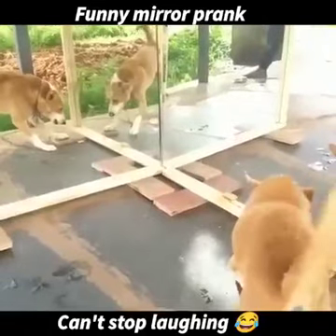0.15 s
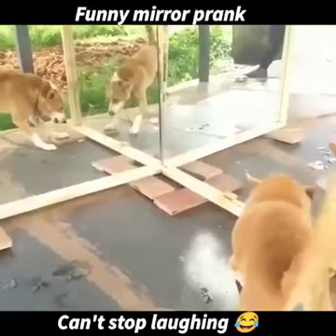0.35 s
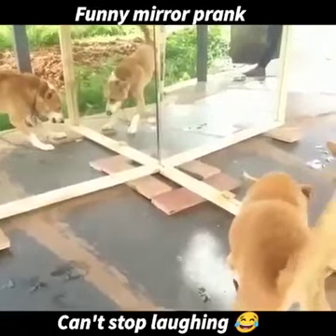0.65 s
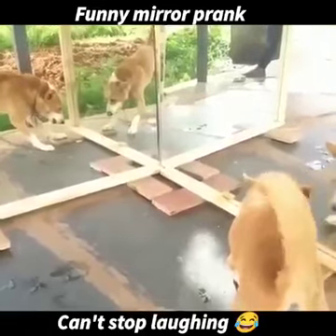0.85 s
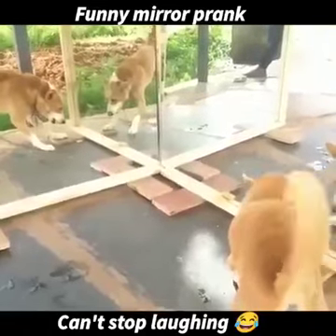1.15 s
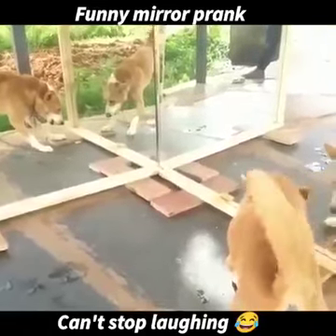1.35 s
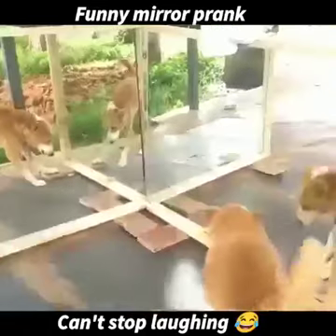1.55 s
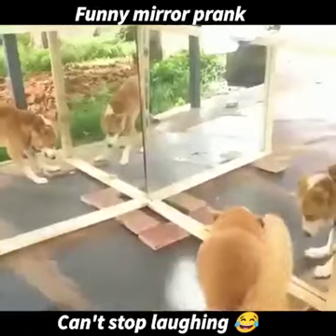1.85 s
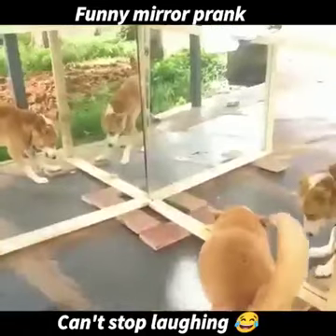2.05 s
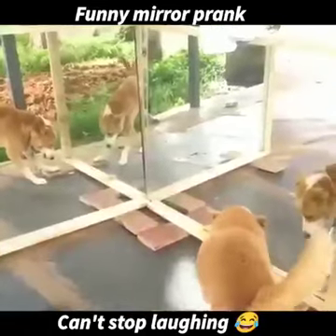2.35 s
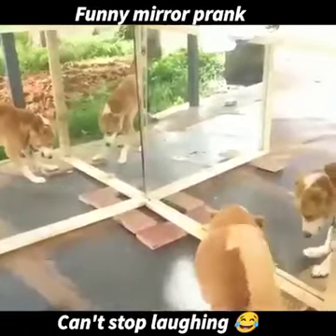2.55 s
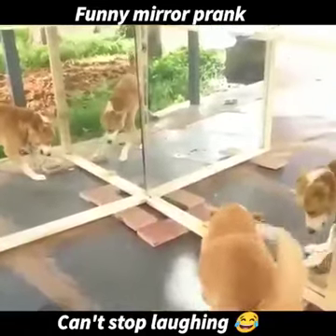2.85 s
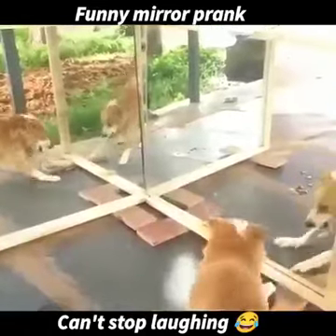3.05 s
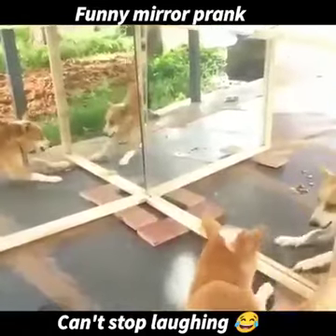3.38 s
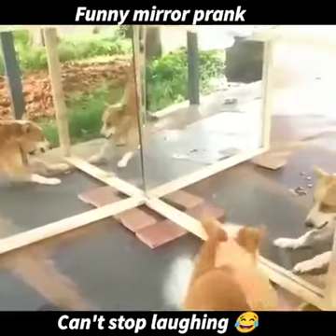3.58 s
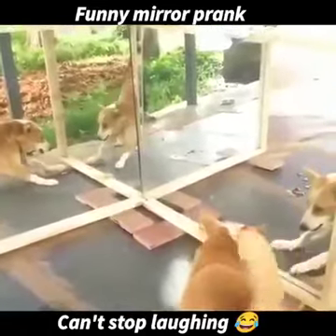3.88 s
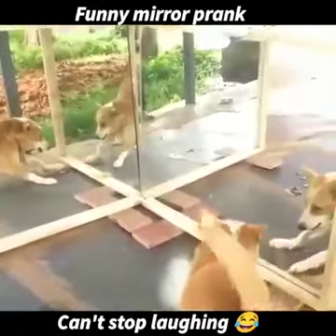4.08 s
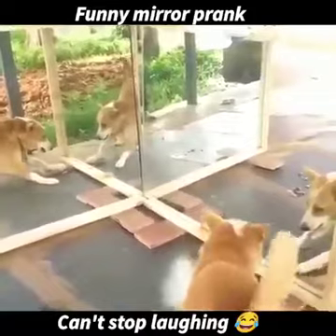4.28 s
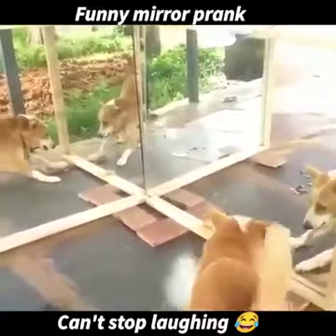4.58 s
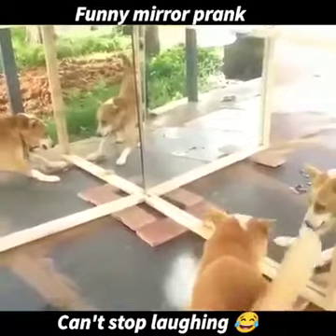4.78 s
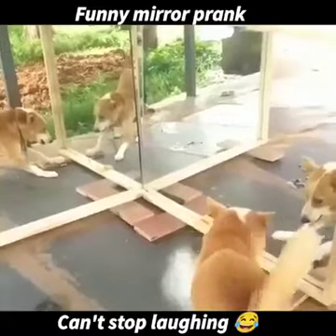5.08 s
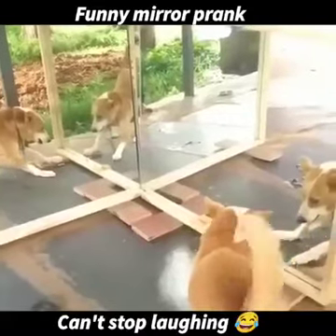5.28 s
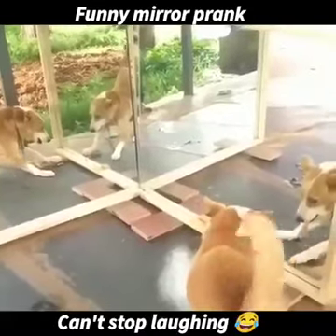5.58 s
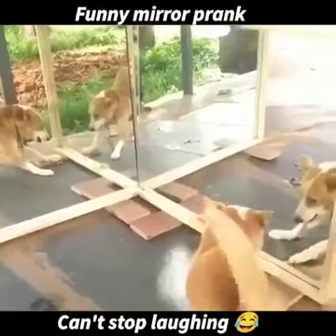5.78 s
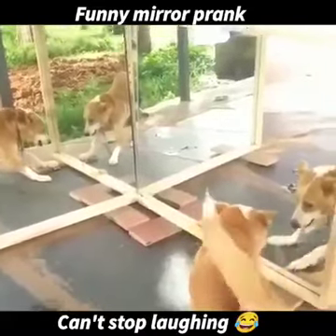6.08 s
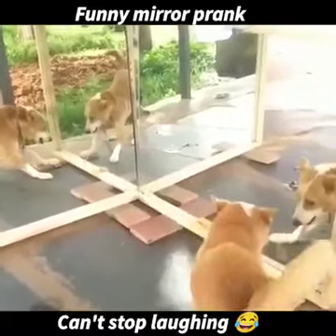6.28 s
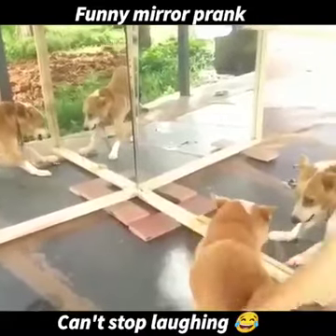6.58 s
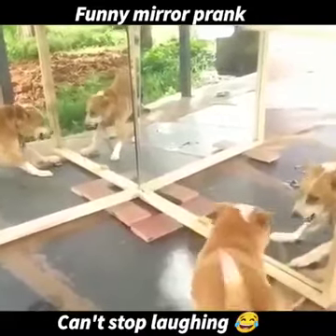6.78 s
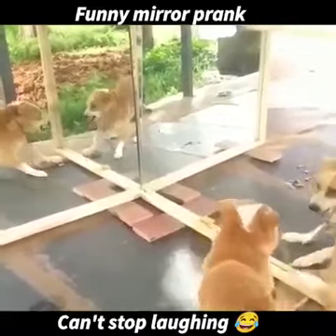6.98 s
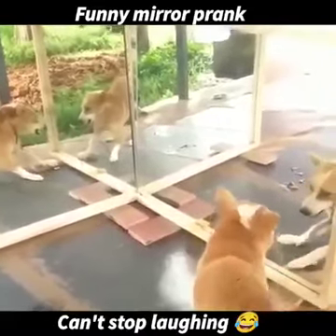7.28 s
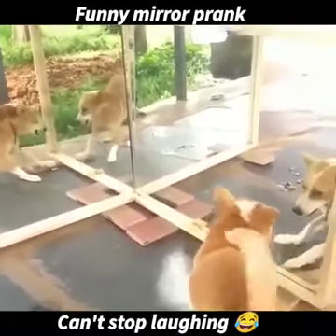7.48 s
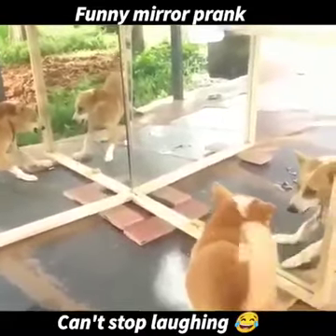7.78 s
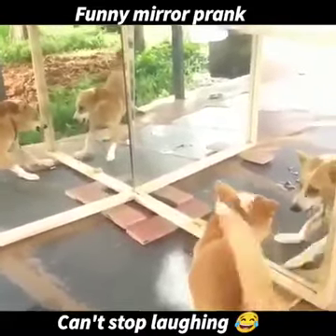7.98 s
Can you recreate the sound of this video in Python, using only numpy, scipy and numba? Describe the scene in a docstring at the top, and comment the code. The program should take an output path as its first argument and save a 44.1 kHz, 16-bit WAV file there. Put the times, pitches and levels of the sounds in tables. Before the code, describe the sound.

A small dog growls close by on a hard-floored, roofed patio. From 0 to 1 s the growl is already strong: an uneven flutter around fifty beats a second, hard hollow throat pops, chest hum and rasp of air. A second stroke starts at 1.05 s, more breathy; at about 1.6 s a nasal snarl with a thin whine leads into a weaker growl until 2.5 s. After a near pause come snorts, a small grunt, a snap and one abrupt hoarse bark at 3.0-3.1 s, then a drawn breath. Quiet growling builds from 3.4 s; from 4.15 to 5.35 s it is loud and full of pops and wet crackles. Rougher strokes follow to 6.7 s, where a hoarse cluster of barks tumbles out until 7 s with a huff. A faint growl follows from 7.1 s, then a firmer one from 7.7 s, swelling near 8 s. Short wall echoes, faint yard noise.

```python
"""On a roofed patio a small dog squares up to a mirror and growls in long runs, a stroke of air at a time.
Pulse trains and noise are the source, resonators the vocal tract: loose folds flap unevenly in the throat,
the chest hums below and air rasps past the teeth. Snorts, a nasal snarl and two outbreaks of hoarse barking
break in. Near walls answer briefly with a decaying wash, and a close pair of microphones turns the treble
in and out of phase."""
import sys
import numpy as np
from scipy import signal
from scipy.fft import rfft, irfft, next_fast_len
from scipy.io import wavfile
from scipy.ndimage import uniform_filter1d
from numba import njit

SR = 44100
rng = np.random.default_rng(int(sys.argv[2]) if len(sys.argv) > 2 else 0)


def pcm_store(signal):
    """Save signal as 16-bit PCM."""
    levels = np.round(np.clip(np.atleast_2d(signal), -1, 1) * 32767)
    wavfile.write(sys.argv[1], SR, levels.astype(np.int16).T)


N = 358974
TIME = np.arange(N) / SR

# single hard flaps that burst out of the growl: crest t/s, relative level/dB, 1/e half length/s, ring f/Hz
HARD_FLAPS = [(0.024, -9.5, 0.004, 655), (0.087, -13, 0.013, 660), (0.102, -10, 0.0061, 618),
              (0.141, -11.5, 0.0039, 618), (0.2, -15.5, 0.0055, 630), (0.275, -10, 0.0066, 585),
              (0.32, -11.0, 0.009, 678), (0.335, -10, 0.0058, 655), (0.358, -5.5, 0.0039, 658),
              (0.381, -8, 0.0019, 655), (0.39, -11.5, 0.003, 655), (0.431, -8.5, 0.0052, 610),
              (0.45, -11, 0.0036, 610), (0.536, -11.5, 0.013, 612), (0.565, -10.5, 0.013, 668),
              (0.584, -7, 0.0041, 660), (0.596, -7.5, 0.0021, 655), (0.625, -7.0, 0.0031, 692),
              (0.652, -13, 0.004, 645), (0.71, -13, 0.0032, 645), (0.792, -12, 0.0035, 630),
              (0.892, -12.5, 0.0072, 657), (0.922, -8.5, 0.0042, 715), (0.978, -15.5, 0.0034, 647),
              (4.159, -25.5, 0.005, 630), (4.331, -15, 0.0033, 607), (4.449, -10.5, 0.0055, 600),
              (4.532, -8.5, 0.0079, 618), (4.579, -7.5, 0.0045, 658), (4.633, -10.5, 0.0099, 609),
              (4.694, -11.0, 0.0037, 636), (4.712, -10.5, 0.0061, 655), (4.745, -3, 0.0033, 637),
              (4.785, -13.5, 0.0034, 597), (4.833, -10, 0.0054, 606), (4.884, -9.5, 0.0043, 628),
              (4.9, -12, 0.011, 650), (4.922, -11, 0.0066, 602), (5.012, -14, 0.004, 616),
              (5.037, -7, 0.0052, 680), (5.06, -9, 0.0058, 682), (5.134, -9.5, 0.0027, 655),
              (5.171, -5, 0.0062, 617), (5.188, -7, 0.0025, 640), (5.237, -11.5, 0.0078, 633),
              (5.262, -6, 0.0025, 650), (5.555, -19.5, 0.008, 692), (5.606, -13.5, 0.0044, 680),
              (5.717, -16.0, 0.0038, 673), (5.733, -17, 0.011, 706), (5.779, -13.5, 0.0031, 662),
              (5.973, -15.5, 0.0068, 692), (6.147, -17, 0.0055, 647), (6.198, -13.5, 0.0049, 643),
              (6.31, -18, 0.0045, 658), (6.46, -15, 0.0035, 692), (6.495, -12.5, 0.0032, 667),
              (6.638, -23, 0.0042, 666), (6.713, -13, 0.004, 668), (6.725, -11, 0.0066, 677),
              (6.751, -6.5, 0.0061, 607), (6.77, -6.5, 0.0054, 705), (8.003, -13.5, 0.0032, 638),
              (8.099, -14, 0.0051, 680)]
# resonances of the cheeks: f/Hz, width/Hz, relative level/dB
CHEEK_MODES = [(1214, 510, -4.5), (2034, 63, 4)]
# resonances that bursts of spit ring with: f/Hz, width/Hz, relative level/dB
SPIT_MODES = [(3210, 200, -2), (3630, 450, -9)]
VOICE_TAIL_S = 0.03   # the barking voice runs on weakly after the push


def from_db(db):
    """Logarithmic level: decibels to amplitude gain."""
    return 10 ** (np.asarray(db) / 20)


def rms_one(x):
    """Power normalisation: scale to an rms of 1."""
    return x / np.sqrt(np.mean(x ** 2) + 1e-20)


def at_hz(points, hz):
    """Interpolation on a log-frequency axis, on which the ear hears pitch."""
    points = np.array(points)
    return np.interp(np.log(hz + 1e-3), np.log(points[:, 0]), points[:, 1])


def noise(spectrum):
    """Spectral shaping: white noise weighted by frequency, with an rms of 1."""
    size = next_fast_len(N)
    hz = np.fft.rfftfreq(size, 1 / SR)
    white = rfft(rng.standard_normal(size))
    return rms_one(irfft(white * from_db(at_hz(spectrum, hz)), size)[:N])


def drift(rate):
    """Low-passed chance: a smooth random curve of rms 1 that changes about rate times a second."""
    step = 40   # samples between the computed points
    r = np.exp(-2 * step * np.pi * rate / SR)
    settling = 2000
    chance = rng.standard_normal(N // step + settling + 2)
    slow = signal.lfilter([1], [1, -2 * r, r * r], chance)[settling:]
    return np.interp(np.arange(N) / step, np.arange(len(slow)), rms_one(slow))


def pulses(hz, jitter, shimmer_db, anchors_s=None):
    """Glottal source: a click a cycle, with jitter in timing and shimmer in level; anchors pull the phase."""
    cycles = np.cumsum(hz * np.exp(jitter * drift(np.mean(hz) / 2))) / SR
    if anchors_s is not None:
        anchor_phase = 2 * np.pi * np.interp(anchors_s, TIME, cycles)
        offsets = np.unwrap(anchor_phase) / (2 * np.pi)
        cycles = np.maximum.accumulate(cycles - np.interp(TIME, anchors_s, offsets))
    clicks = np.diff(np.floor(cycles), prepend=np.floor(cycles[0]))
    return clicks * from_db(shimmer_db * np.clip(rng.standard_normal(N), -2, 2))


def fade(clicks, decay_s):
    """Exponential relaxation: each click becomes a puff that dies away."""
    return signal.lfilter([1], [1, -np.exp(-1 / (decay_s * SR))], clicks + 1e-18)


@njit
def ring(x, pull, r):
    """Damped oscillator: a two-pole resonator whose centre may move from sample to sample."""
    y = np.zeros(len(x))
    for i in range(2, len(x)):
        push = (x[i] - x[i - 2]) * (1 - r * r) / 2
        y[i] = push + pull[i] * y[i - 1] - r * r * y[i - 2] + 1e-18
    return y


def resonate(x, modes):
    """Modal superposition: parallel resonances of alternating sign; centre and level may be curves."""
    out = 0
    for k, (hz, width, db) in enumerate(modes):
        r = np.exp(-np.pi * width / SR)
        pull = np.zeros(N) + 2 * r * np.cos(2 * np.pi * hz / SR)
        out = out + (-1) ** k * from_db(db) * ring(x, pull, r)
    return out


def cut(x, hz, kind, order=2):
    """Band limitation by a Butterworth low-pass or high-pass."""
    return signal.sosfilt(signal.butter(order, hz, kind, fs=SR, output="sos"), x)


def even(x, size):
    """Short-term power normalisation: hold the rms near 1 over size samples, leaving faster flutter."""
    power = uniform_filter1d(uniform_filter1d(x ** 2, size), size // 2)
    return x / np.sqrt(np.abs(power) + 1e-12)


def flap_drive(flaps, puff_s, leak):
    """Airflow modulation: every flap lets a puff swell and die; some air leaks in between."""
    return rms_one(rms_one(fade(fade(flaps, puff_s), puff_s)) + leak)


def strokes():
    """Subglottal pressure: the push of air sets five part gains; each stroke has its own flap rate."""
    # strokes of the growl: start t/s, crest t/s, end t/s, swell/dB, sag/dB, nominal flap rate/Hz,
    # then relative level/dB at the crest of throat, pharynx, chest, rasp and air
    stroke_table = [(0, 0.56, 1.048, 0, 1, 54, -19, -27, -33.5, -30.5, -45.5),
                    (1.05, 1.172, 1.594, 7, 13.5, 47, -24.5, -31, -28.5, -27.5, -39),
                    (1.57, 1.785, 2.488, 16, 1, 55, -29, -25, -29, -38, -43.5),
                    (3.365, 4.035, 4.11, 5, -14.5, 54, -31.5, -38.5, -39, -39, -48.5),
                    (4.15, 4.59, 5.365, 6.5, 0, 44, -20.5, -29, -35.5, -36, -49),
                    (5.36, 5.637, 6.124, 8.5, 6.5, 52, -23, -30, -29.5, -29.5, -39),
                    (6.117, 6.158, 6.625, 4.5, 3, 54, -24.5, -34, -31.5, -33, -43),
                    (6.603, 6.742, 6.84, 10.5, 22, 60, -20.5, -22.5, -30.5, -45, -43.5),
                    (7.09, 7.414, 7.665, 18, 0.5, 68, -37, -45, -42.5, -48.5, -53),
                    (7.674, 8.053, 8.65, 13.5, 8, 63, -25, -34.5, -39.5, -44, -56.5)]
    # how far throat, pharynx, chest, rasp and air follow the push: ratio/(dB per dB)
    follows = (1.02, 1.19, 1.09, 1.3, 1.27)
    # the push slackens for a moment in mid-stroke: t/s, depth/dB, 1/e half length/s
    slack_table = [(0.48, 2.5, 0.021), (0.834, 3.5, 0.027), (3.857, 3.5, 0.11), (4.952, 1.5, 0.03),
                   (5.854, 0.5, 0.03), (6.398, 1.5, 0.034)]
    attack_s, release_s = 0.053, 0.065
    pharynx_fade_db = 5.5   # the hollow tone thins out over each stroke as the jaw loosens
    gains, flap_hz = np.zeros((5, N)), np.zeros(N)
    slack_db = 1.74 * drift(8.3)   # the push is never quite steady
    for s, db, half_s in slack_table:
        slack_db = slack_db + db * np.exp(-np.minimum(((TIME - s) / half_s) ** 2, 20))
    for start, crest, end, swell_db, sag_db, rate, *levels_db in stroke_table:
        span = (TIME >= start) & (TIME < end)
        t = TIME[span]
        push_db = np.interp(t, [start, crest, end], [-swell_db, 0, -sag_db]) - slack_db[span]
        # the first stroke is already under way
        rise = np.minimum((t - start) / attack_s, 1) if start > attack_s else 1
        gate = rise * np.minimum((end - t) / release_s, 1) ** 2
        parts_db = np.array(levels_db)[:, None] + np.outer(follows, push_db)
        parts_db[1] -= pharynx_fade_db * ((t - start) / (end - start) - .5)
        gains[:, span] += gate * from_db(parts_db)
        flap_hz[TIME >= start] = rate
    return gains, flap_hz


def tract():
    """Formant theory: resonances of throat and muzzle move with tongue, jaw and lips."""
    # fixed throat resonances: f/Hz, width/Hz, relative level/dB
    throat_modes = [(428, 70, -12), (589.3, 84.5, 0)]
    # highest throat resonance: f/Hz, width/Hz, relative level/dB
    throat_top = (1466, 350, -27)
    # muzzle resonances: f/Hz, width/Hz, relative level/dB
    muzzle_modes = [(2552, 156, -1.5), (2660, 160, 4)]
    # resonance at the teeth: f/Hz, width/Hz, relative level/dB
    teeth_mode = (4035, 240, -4)
    # mouth shape as the growl goes on: t/s, throat f/Hz, tongue f/Hz, tongue level/dB, mouth f/Hz,
    # cheek level offset/dB, lip f/Hz, lip level/dB
    shape_table = [(0.3, 675, 810, -7.5, 992, 0.5, 3017, 9.5), (1.3, 669, 798, -1.5, 976, -6, 3174, 0.5),
                   (2.1, 719, 827, -15, 914, -6.5, 3250, 4), (3.8, 714, 780, -26, 970, 0.5, 3070, -1.5),
                   (4.6, 653, 752, -7, 1002, 2.5, 3115, 2.5), (5.22, 684, 753, -10.5, 990, 1.5, 3210, 5),
                   (5.7, 708, 780, -12, 970, 1.5, 3120, -0.5), (6.4, 708, 796, -1, 973, 3.5, 3120, 6.5),
                   (7.4, 703, 764, -9, 920, -4, 3200, 1), (8.0, 704, 747, -10, 892, 1, 3350, 8)]
    times, *columns = np.transpose(shape_table)
    curves = (np.interp(TIME, times, column) for column in columns)
    throat_hz, tongue_hz, tongue_db, mouth_hz, cheeks_db, lips_hz, lips_db = curves
    # moving modes: centre Hz, width Hz, level dB
    moving = [(throat_hz, 63, 2), (tongue_hz, 39.5, tongue_db), (mouth_hz, 91, -10.5)]
    cheeks = [(hz, width, db + cheeks_db) for hz, width, db in CHEEK_MODES]
    return throat_modes + moving + [throat_top], cheeks + muzzle_modes + [(lips_hz, 122, lips_db), teeth_mode]


def throb_share(depth=0.6, hold_s=0.009):
    """Glottal closure: the folds hold shut round each hard flap, so the ordinary throat voice gives way."""
    times = np.array(HARD_FLAPS)[:, 0]
    nearest = times[np.searchsorted((times[1:] + times[:-1]) / 2, TIME)]
    return np.clip(depth, 0, 1) * np.exp(-((TIME - nearest) / hold_s) ** 2)


def growl(throat_db=-2, pharynx_db=0, chest_db=2, rasp_db=-0.92, air_db=0, rumble_db=-27.5,
          fold_share=0.78, flap_share=0.42, turbulence=0.64, twang=0.036, rattle=.15):
    """Source and filter: slow flaps and a rough low voice excite the tract; flaps modulate air at the teeth."""
    # pharynx resonances: f/Hz, width/Hz, relative level/dB
    pharynx_modes = [(282.4, 41.5, -1), (330, 56, -0.5), (371, 43.3, -2), (441, 35, -13)]
    # chest resonances: f/Hz, width/Hz, relative level/dB
    chest_modes = [(110.3, 38.4, -2), (132.7, 35, 2), (156.4, 27.5, 0), (214, 38, -3.5)]
    # spectrum of air at the teeth: f/Hz, relative density level/dB
    air_spectrum = [(500, -20), (1500, -20), (3800, 6), (5000, 3.5), (6500, 7.5), (7950, 1.5),
                    (8400, -12.5), (11000, -10.5), (13000, -17), (16000, -23)]
    # spectrum of the rumble under the chest hum: f/Hz, relative density level/dB
    rumble_spectrum = [(20, -16.5), (60, -5.5), (100, -11), (200, -38.5), (1000, -96)]
    (throat, pharynx, chest, rasp, air), flap_hz = strokes()
    throat_modes, muzzle_modes = tract()
    flap_lead_s = 0.004   # a hard flap comes this long before the crest of its ring
    anchors_s = np.array(HARD_FLAPS)[:, 0] - flap_lead_s
    flaps = pulses(flap_hz, jitter=.13, shimmer_db=3.0, anchors_s=anchors_s)
    puffs = flap_drive(flaps, puff_s=0.0045, leak=1.0)
    folds = rms_one(pulses(np.full(N, 118.), jitter=.28, shimmer_db=2.0))
    drive = rms_one(flaps) + fold_share * folds + turbulence * puffs * rng.standard_normal(N)

    voice = resonate(drive, throat_modes) * puffs ** rattle
    voice = cut(cut(voice, 390, "high", order=3), 1270, "low", order=3)
    hollow = cut(cut(resonate(drive, pharynx_modes), 170, "high"), 486, "low", order=4)
    hum = resonate(folds + flap_share * drive, chest_modes)
    hum = cut(cut(hum, 89, "high", order=4), 238, "low", order=4)
    rumble = from_db(rumble_db + 7.5 * drift(7.4)) * noise(rumble_spectrum)
    teeth = resonate(puffs * rng.standard_normal(N) + twang * drive, muzzle_modes)
    teeth = cut(cut(teeth, 3870, "low", order=4), 1050, "high")
    hiss = rms_one(1 + 1.7 * puffs) * noise(air_spectrum)

    out = from_db(throat_db) * throat * even(voice, size=2200) * (1 - throb_share())
    out += from_db(pharynx_db) * pharynx * even(hollow, size=2400)
    out += chest * (from_db(chest_db) * even(hum, size=2600) + rumble)
    out += from_db(rasp_db) * rasp * even(teeth, size=2400)
    return out + from_db(air_db) * air * hiss


def throbs(level_db=-0.84, spit_db=-23, overtone_hz=990, overtone_db=-21):
    """Transient resonance: a hard flap is a tone in a brief Gaussian swell, spitting air as it goes."""
    out = np.zeros(N)
    spit = resonate(rng.standard_normal(N), CHEEK_MODES + SPIT_MODES)
    spit = rms_one(cut(spit, 4800, "low", order=5))
    for s, db, length_s, ring_hz in HARD_FLAPS:
        crest, reach = int(s * SR), SR // 20
        span = slice(max(crest - reach, 0), crest + reach)
        age = TIME[span] - s
        tone = np.sin(2 * np.pi * ring_hz * age)
        tone += from_db(overtone_db) * np.sin(2 * np.pi * overtone_hz * age)
        swell = from_db(db + level_db) * np.exp(-(age / length_s) ** 2)
        out[span] += swell * (tone + from_db(spit_db) * spit[span])
    return out


def envelope(start_s, hold_s, attack_s, release_s):
    """Amplitude envelope: linear rise, level until the hold is over, then exponential decay."""
    age = TIME - start_s
    return np.clip(age / attack_s, 0, 1) * np.exp(-np.clip((age - hold_s) / release_s, 0, 20))


def huffs():
    """Turbulent flow: snorts and a slow drawn breath are shaped noise under envelopes."""
    # snorts and huffs between strokes and round the barks: start t/s, hold/s, level/dB
    huff_table = [(1.01, 0.088, -42), (2.761, 0.26, -52), (2.991, 0.061, -36), (3.06, 0.06, -26.5),
                  (3.15, 0.12, -38), (6.545, 0.016, -34.5), (6.77, 0.14, -32.5), (6.901, .12, -39.5)]
    # the breath drawn after the first bark begins: start t/s, hold/s, level/dB
    intake = (3.1, 0.32, -39)
    # spectrum of the breath: f/Hz, relative density level/dB
    huff_spectrum = [(80, -17), (300, -10), (620, -4.5), (820, -5), (1300, -7.5), (2300, -18), (4000, -16),
                     (7900, -22.5), (8700, -32), (16000, -50.5)]
    attack_s, release_s = 0.026, 0.019
    gain = sum(from_db(db) * envelope(s, hold, attack_s, release_s) for s, hold, db in huff_table)
    start, hold, db = intake
    gain += from_db(db) * envelope(start, hold, hold, release_s) ** 2
    return gain * noise(huff_spectrum)


def snarl(whine_hz=623, whine_db=-38, whine_wobble=.009):
    """Nasal turbulence and harmonics: air through the wrinkled nose, with a thin nearly steady whine on it."""
    # the snarl: start t/s, hold/s, level/dB of its air
    snarl_event = (1.568, 0.15, -33.5)
    # nose resonances: f/Hz, width/Hz, relative level/dB
    nose_modes = [(1730, 270, 3), (1040, 270, -2.5), (2400, 290, 0), (4200, 130, -7)]
    # partials of the whine: multiple/1, relative level/dB
    whine_partials = [(1, -2.5), (2, 1), (4, -3), (5, 2.5), (6, 1), (7, -1)]
    start, hold, db = snarl_event
    hiss = rms_one(cut(resonate(rng.standard_normal(N), nose_modes), 8500, "low", order=4))
    phase = 2 * np.pi * np.cumsum(whine_hz * (1 + whine_wobble * drift(18.8))) / SR
    whine = rms_one(sum(from_db(part_db) * np.sin(round(k) * phase) for k, part_db in whine_partials))
    air = from_db(db) * envelope(start, hold, attack_s=0.15, release_s=0.052) * hiss
    whine_gain = from_db(whine_db) * envelope(start, hold_s=0.18, attack_s=0.14, release_s=0.018)
    return air + whine_gain * whine


def glide(start_s, hold_s, first_hz, top_hz, sag_hz_per_s=1800):
    """Fold tension: pitch climbs while the dog pushes and sags when it lets go."""
    age = TIME - start_s
    climb = first_hz + (top_hz - first_hz) * np.sin(np.pi / 2 * np.clip(age / hold_s, 0, 1))
    return climb - sag_hz_per_s * np.clip(age - hold_s, 0, VOICE_TAIL_S)


def grunt():
    """Frequency modulation: a closed-mouth grunt is a sine whose gliding pitch wavers at random."""
    # the grunt that winds up the first bark: start t/s, hold/s, level/dB, first f/Hz, top f/Hz
    grunt_event = (3.002, .034, -27, 230, 295)
    start, hold, db, first_hz, top_hz = grunt_event
    pitch = glide(start, hold, first_hz, top_hz) * (1 + 0.14 * drift(120))
    tone = np.sqrt(2) * np.sin(2 * np.pi * np.cumsum(pitch) / SR)
    return from_db(db) * envelope(start, hold, attack_s=0.025, release_s=0.015) * tone


def snaps():
    """Impulsive noise: snaps and scuffs start at once and decay exponentially."""
    # sharp snaps and scuffs: t/s, level/dB, decay/s
    snap_table = [(3.014, -17, 0.007), (3.071, -34, 0.025), (4.444, -35, 0.0027)]
    # their spectrum: f/Hz, relative density level/dB
    snap_spectrum = [(200, -24), (1500, -2.5), (3000, 3.5), (6000, -0.5), (8000, -14.5), (10000, -37),
                     (16000, -33)]
    gain = sum(from_db(db) * fade(np.arange(N) == int(s * SR), decay) for s, db, decay in snap_table)
    return gain * noise(snap_spectrum)


def barks(upper_db=-4, level_db=-2.0, middle_db=-2, low_db=-3, fundamental_db=-11,
          jaw_s=0.038, jaw_shut_db=-10, release_s=0.0073):
    """Source and filter with the jaw dropping: hoarse gliding pulses excite open mouth and bared teeth."""
    # barks and yelps: start t/s, attack/s, hold/s, relative level/dB, first f/Hz, top f/Hz,
    # hoarseness/(noise per pulse), depth/dB, brightness/dB, bared teeth/dB, tail/dB
    bark_table = [(3.066, 0.004, .055, -13, 330, 554.2, .55, 4, 4, -16.5, -6),
                  (6.714, 0.066, .072, -21.5, 319.4, 401.2, 1.5, 4.5, 1, 6.5, -14.5),
                  (6.79, 0.016, .04, -19.5, 411, 466.7, 1.8, -1.5, 0.5, -6, -15),
                  (6.83, 0.0053, .045, -15, 463.5, 515.7, .9, -3, -23, -13.5, -13.5),
                  (6.889, 0.0036, .012, -24, 531, 512, 1.7, 3.5, -12, -21, -12.5),
                  (6.937, 0.014, 0.028, -27.5, 457, 498.5, 0.46, -15, -24, -7, -13)]
    # open-mouth resonances, low, middle and upper: f/Hz, width/Hz, relative level/dB
    low_modes = [(453, 127, -3.5), (655, 100, 0)]
    middle_modes = [(1013, 105, 0)]
    upper_modes = [(1230, 260, -1), (2100, 180, -2), (2370, 260, -15)]
    # resonances at the bared teeth: f/Hz, width/Hz, relative level/dB
    bite_modes = [(2144, 55, 6.5), (2855, 270, 3), (2874, 290, 6.5), (3380, 280, -5.5)]
    pitch, hoarse = np.full(N, bark_table[0][4], float), np.zeros(N)
    loud, deep, bright, bared = np.zeros((4, N))
    for (start, attack, hold, db, first_hz, top_hz, hoarseness,
         depth_db, bright_db, teeth_db, tail_db) in bark_table:
        pitch = np.where(TIME >= start, glide(start, hold, first_hz, top_hz), pitch)
        hoarse[TIME >= start] = hoarseness
        push = envelope(start, hold, attack, release_s)
        tail = from_db(tail_db) * envelope(start, hold, attack, VOICE_TAIL_S)
        gain = from_db(db) * np.maximum(push, tail)
        jaw_db = jaw_shut_db * np.clip(1 - (TIME - start) / jaw_s, 0, 1)
        loud = loud + gain
        deep = deep + gain * from_db(depth_db)
        bright = bright + gain * from_db(bright_db + jaw_db)
        bared = bared + gain * from_db(teeth_db + jaw_db)
    # the folds beat unevenly from cycle to cycle
    beats = pulses(pitch, jitter=.045 * hoarse, shimmer_db=2)
    drive = rms_one(beats) + hoarse * rms_one(fade(beats, 0.0048) * rng.standard_normal(N))
    low = even(cut(cut(resonate(drive, low_modes), 322, "high", order=4), 900, "low"), size=400)
    middle = even(cut(cut(resonate(drive, middle_modes), 700, "high"), 1500, "low"), size=400)
    edge = even(cut(cut(resonate(drive, upper_modes), 820, "high"), 3300, "low", order=4), size=400)
    bite = even(cut(cut(resonate(drive, bite_modes), 1500, "high"), 3900, "low"), size=400)
    wavering = pitch * (1 + 0.038 * drift(147))
    fundamental = np.sqrt(2) * np.sin(2 * np.pi * np.cumsum(wavering) / SR)
    body = deep * (from_db(low_db) * low + from_db(fundamental_db) * fundamental)
    body += from_db(middle_db) * loud * middle
    return from_db(level_db) * (body + from_db(upper_db) * bright * edge + bared * bite)


def spits():
    """Burst noise: wet little gusts of resonant air crackle between the teeth."""
    # crackles: t/s, level/dB, 1/e half length/s
    spit_table = [(4.657, -39, .003), (4.693, -32, 0.0035), (4.742, -34, .005), (5.006, -28.5, 0.0023),
                  (5.096, -30, 0.0016), (5.204, -25, 0.0023), (5.229, -32.5, 0.0053), (5.238, -34, 0.0014),
                  (5.257, -40, 0.0027), (5.278, -32.5, 0.0026)]
    bursts = sum(from_db(db) * np.exp(-np.minimum(((TIME - s) / half_s) ** 2, 20))
                 for s, db, half_s in spit_table)
    crackle = cut(cut(resonate(rng.standard_normal(N), SPIT_MODES), 2600, "high"), 4300, "low")
    return bursts * even(crackle, size=200)


def patio(x, echo_db, first_echo_s=0.00267, wall_hz=7000, t60_s=0.11, mirror_s=.0071, mirror_db=-14.5):
    """Reflection and reverberation: one mirror echo and a short dense wash from floor and roof."""
    age = TIME[:SR // 2]
    echoes = cut(rng.standard_normal(len(age)), wall_hz, "low", order=1)
    echoes *= from_db(-60 * age / t60_s) * (age > first_echo_s)
    echoes *= from_db(echo_db) * np.sqrt(2 * wall_hz / SR / np.sum(echoes ** 2))
    echoes[int(mirror_s * SR)] += from_db(mirror_db)   # the pane sends the sound straight back
    return (x + signal.fftconvolve(x, echoes)[:N]) / np.hypot(1, from_db(echo_db))


def scene():
    """Interaural-style phase: sum and difference have their own echoes and share the sound by frequency."""
    # spectrum of the yard noise: f/Hz, relative density level/dB
    yard_spectrum = [(25, -33.5), (55, -22), (100, -1), (180, -7.5), (320, -3), (800, -13), (2000, -15.5),
                     (4000, -16.5), (7900, -24.5), (8700, -38.5), (16000, -43)]
    # phase by which the left leads, before the dwell below: f/Hz, phase/rad
    port_phase = [(100, -1.4), (240, -0.48), (490, -1.14), (620, 0.18), (770, 0.65), (900, 0.07), (1200, 0),
                  (1600, 0.9), (1900, 1.4747), (2350, 3), (2800, 4.5), (3600, 7.5), (4100, 8), (4700, 9),
                  (5700, 13.5), (6400, 14.1), (6920, 16), (7450, 18), (8300, 18), (9950, 22.5), (15600, 37)]
    # balance between the microphones: f/Hz, left-right level/dB
    port_balance = [(40, -2), (90, 9.5), (180, -0.5), (420, 4), (650, 2), (1000, -0.5)]
    dog = growl() + throbs() + huffs() + snarl() + grunt() + snaps() + barks() + spits()
    size = next_fast_len(N + SR // 10)
    hz = np.fft.rfftfreq(size, 1 / SR)
    yard = from_db(-52 - 0.5 * drift(4.9))
    # echo levels in dB of the sum and the difference
    mid, side = (rfft(patio(dog, echo_db) + yard * noise(yard_spectrum), size) for echo_db in (-6.5, -2.5))
    turn = np.interp(hz, *np.transpose(port_phase))
    # the phase lingers at "alike" and "opposed", fully so from 1550 Hz up
    turn = turn - 0.59 * np.minimum(hz / 1550, 1) * np.sin(2 * turn)
    sign = np.array([[1], [-1]])   # left, right
    pair = mid * np.cos(turn / 2) + 1j * sign * side * np.sin(turn / 2)
    return irfft(pair * from_db(sign * at_hz(port_balance, hz) / 2), size)[:, :N]


def record(dry):
    """Self-noise, saturation and band limit: faint hiss is added, peaks are rounded and the top is cut."""
    hiss_db, ceiling, stop_hz = -69, 1.3, 16485
    live = dry + from_db(hiss_db) * rng.standard_normal(dry.shape)
    rounded = ceiling * np.tanh(live / ceiling)
    return signal.sosfilt(signal.cheby2(14, 70, stop_hz, fs=SR, output="sos"), rounded)


dry = scene()
out = record(dry)
pcm_store(out)
```